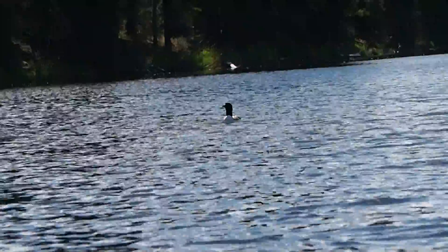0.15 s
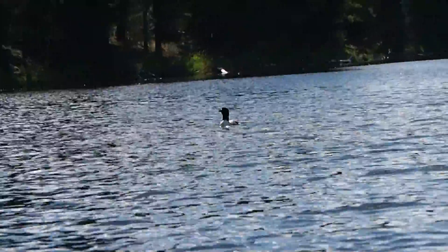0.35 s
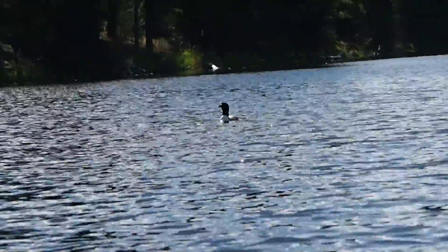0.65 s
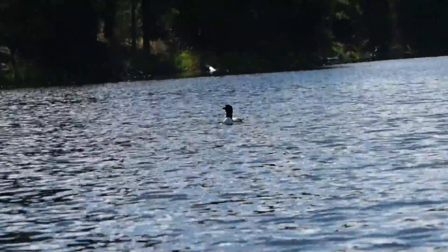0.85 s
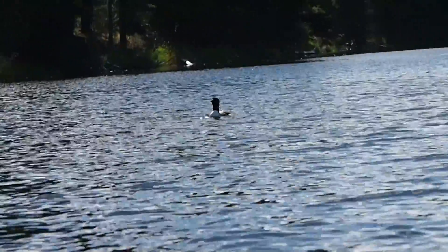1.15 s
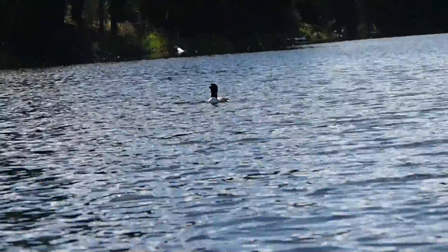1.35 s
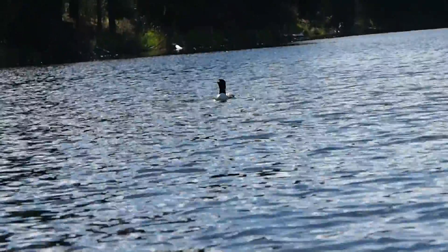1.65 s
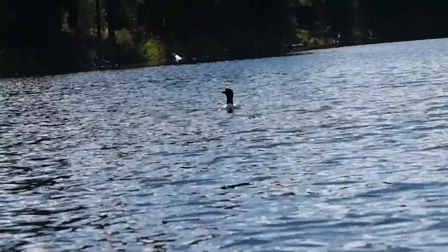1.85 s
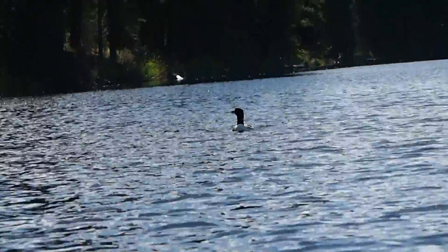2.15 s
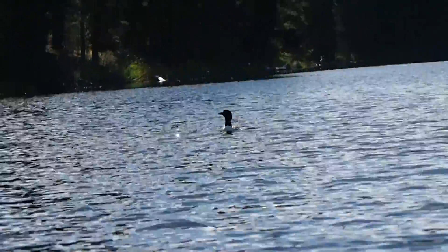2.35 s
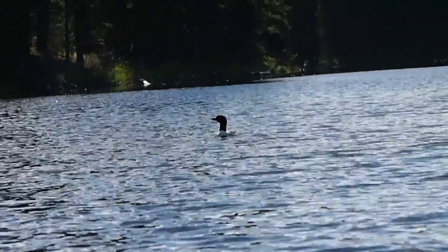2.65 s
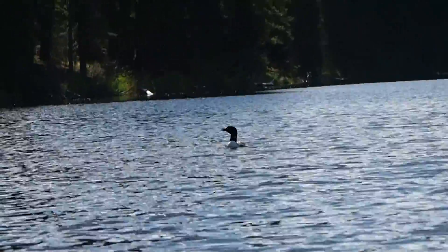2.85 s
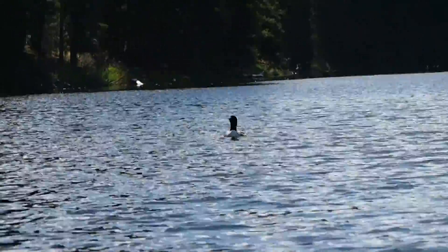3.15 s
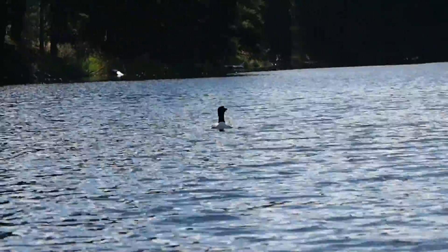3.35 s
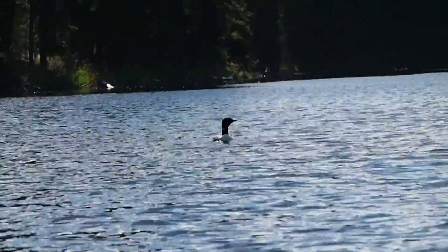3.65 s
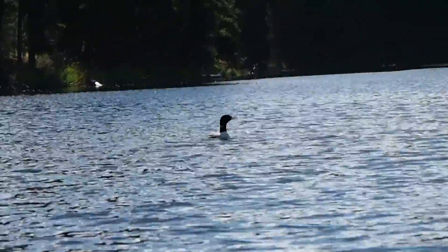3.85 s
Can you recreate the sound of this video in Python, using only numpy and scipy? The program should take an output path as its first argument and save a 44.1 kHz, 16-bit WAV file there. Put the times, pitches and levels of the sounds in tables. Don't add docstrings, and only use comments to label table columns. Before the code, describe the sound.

A loon gives two short bursts of wavering, laughing whistle calls across an echoing forest lake.

```python
import sys
import numpy as np
from scipy import signal
from scipy.fft import rfft, irfft
from scipy.io import wavfile
from scipy.ndimage import uniform_filter1d

SR = 44100
rng = np.random.default_rng(int(sys.argv[2]) if len(sys.argv) > 2 else 0)


def volts_from_decibels(level):
    exponent = np.asarray(level, float) / 20
    return 10 ** exponent


def persist_wave(psi):
    counts = np.round(np.clip(psi, -1, 1) * 32767).astype(np.int16)
    wavfile.write(sys.argv[1], SR, np.atleast_2d(counts).T)


N = 176400


def evened(x):
    return x / np.sqrt(np.mean(x ** 2) + 1e-20)


def read(points, hz):
    f, value = np.transpose(points)
    return np.interp(np.log(hz + 1), np.log(f + 1), value)


def add(mix, s, sound):
    part = mix[round(s * SR):][:len(sound)]
    part += sound[:len(part)]


def colour(x, table):
    size = np.shape(x)[-1]
    return irfft(rfft(x) * volts_from_decibels(read(table, np.fft.rfftfreq(size, 1 / SR))), size)


def band(x, lo_hz, hi_hz):
    return signal.sosfilt(signal.butter(2, [lo_hz, hi_hz], "bandpass", fs=SR, output="sos"), x)


def smooth(x, s):
    return uniform_filter1d(x, max(round(s * SR), 1), mode="nearest")


def air():
    # frequency in Hz, level in dB per Hz.
    hiss_colour = [(15, -59), (25, -24.5), (86, -18), (140, -16), (215, -16.5), (289, -18.5), (358, -16.5),
                   (8120, -33), (15500, -40.5)]
    # frequency in Hz, correlation (0 to 1).
    likeness = [(30, 0.67), (250, 0.59), (1000, 0.3), (4000, 0.2), (8000, 0.12), (14000, .05)]
    hiss_db, patch_db = -55, 0.37
    insects_hz, insects_width_hz, insects_db = 7970, 600, -70.5
    frames, hz = N // 256 + 5, np.fft.rfftfreq(1024, 1 / SR)
    a, b, c, d, patches = rng.standard_normal((frames, 513, 5)).T
    patches = uniform_filter1d(uniform_filter1d(patches, 12, 0), 14, 1)
    level_db = read(hiss_colour, hz)[:, None] + patch_db * evened(patches)
    same = np.clip(read(likeness, hz), -1, 1)[:, None]
    left = a + 1j * b
    right = same * left + np.sqrt(1 - same ** 2) * (c + 1j * d)
    z = np.array([left, right]) * volts_from_decibels(level_db)
    hiss = signal.istft(z, nperseg=1024, noverlap=768)[1][:, :N]
    hiss = hiss / np.std(band(hiss, 400, 15000))
    half_hz = insects_width_hz / 2
    insects = band(rng.standard_normal((2, N)), insects_hz - half_hz, insects_hz + half_hz)
    return volts_from_decibels(hiss_db) * hiss + volts_from_decibels(insects_db) * evened(insects)


def motor():
    # time in s, first order level in dB, second order level in dB.
    swells = [(.01, -49, -51.5), (.21, -60.5, -50), (.47, -56, -56.5), (.62, -52, -49.5),
              (1.1, -49.5, -53.5), (1.27, -63, -56.5), (1.47, -49.5, -62.5), (2.5, -50, -55.5),
              (2.68, -56.5, -62.5), (2.8, -49, -53), (3.17, -56, -53.5), (3.34, -46.5, -51),
              (3.72, -68, -58.5), (3.93, -53.5, -71)]
    motor_hz, sag_hz_per_s = 141.8, 0.71
    s, first_db, second_db = np.transpose(swells)
    t = np.arange(N) / SR
    turns = 2 * np.pi * np.cumsum(motor_hz - sag_hz_per_s * t) / SR
    out = np.zeros(N)
    for order, db in enumerate((first_db, second_db), 1):
        out += smooth(volts_from_decibels(np.interp(t, s, db)), 0.05) * np.sin(order * turns)
    return np.sqrt(2) * out


def shore(x):
    # frequency in Hz, T60 in s.
    decay_s = [(600, 3.8), (1200, 2.01), (2500, 0.4), (6000, .6)]
    # frequency in Hz, level in dB.
    echo_colour = [(600, -12.5), (1200, 1), (2400, -6), (5000, -13.5)]
    echo_db, delay_s, rise_s = -17.5, 0.058, 0.32
    far_db, far_t60_s = -34.5, 17.8
    earlier_s, earlier_db = 4.785, 1
    taps_per_s = 400
    noise = rng.standard_normal((2, 3 * SR))
    hits = rng.random(3 * SR) < taps_per_s / SR
    near, apart = noise * hits * np.sqrt(SR / taps_per_s)
    hz, t, z = signal.stft(np.array([near + .3 * apart, near - .3 * apart]), SR, nperseg=256)
    swell = np.clip((t - delay_s) / rise_s, 0, 1)
    shape = swell * (volts_from_decibels(-60 * t / read(decay_s, hz)[:, None]) + volts_from_decibels(far_db - 60 * t / far_t60_s))
    tail = signal.istft(z * shape * volts_from_decibels(read(echo_colour, hz))[:, None], SR, nperseg=256)[1]
    tail = tail / np.sqrt(np.sum(shape[6] ** 2) * 128)
    second = x * (np.arange(N) > 3 * SR)
    earlier = signal.fftconvolve(second[None], tail[::-1], axes=1)[:, round(earlier_s * SR):]
    earlier = np.pad(earlier, ((0, 0), (0, N)))[:, :N]
    echo = signal.fftconvolve(x[None], tail, axes=1)[:, :N]
    return volts_from_decibels(echo_db) * (echo + volts_from_decibels(earlier_db) * earlier)


def hull():
    # start in s, level in dB, length in s, low edge in Hz, high edge in Hz.
    laps = [
        (1.001, -50, 0.058, 513, 2130),
        (1.259, -49.5, 0.043, 670, 2470),
    ]
    # start in s, level in dB, pitch in Hz, length in s.
    gulps = [
        (1.028, -44, 513.6, .05),
        (1.036, -41, 345, .065),
        (1.146, -51, 354, .05),
    ]
    out = np.zeros(N)
    for s, db, length_s, lo_hz, hi_hz in laps:
        u = np.arange(0, 1, 1 / (length_s * SR))
        noise, flicker = rng.standard_normal((2, len(u)))
        fizz = band(noise * volts_from_decibels(3 * evened(smooth(flicker, .002))), lo_hz, hi_hz)
        add(out, s, volts_from_decibels(db) * evened(fizz) * np.sin(np.pi * u ** 0.54))
    for s, db, hz, length_s in gulps:
        u = np.arange(0, 1, 1 / (length_s * SR))
        wobble = 1 + .5 * evened(smooth(rng.standard_normal(SR // 8), 0.0027))[:len(u)]
        tone = np.sin(2 * np.pi * hz * length_s * (u + 0.051 * u ** 2))
        add(out, s, volts_from_decibels(db) * wobble * np.sin(np.pi * u) * tone)
    return out


def waver(t, turns):
    s, hz = np.transpose(turns)
    place = np.interp(t, s, np.arange(len(s)))
    k = np.minimum(place.astype(int), len(s) - 2)
    return hz[k] + (hz[k + 1] - hz[k]) * (1 - np.cos(np.pi * (place - k))) / 2


def whistle(curve, open_db, waves, tones_db, crest_hz, sag_share, buzz):
    # frequency in Hz, gain in dB.
    pipe = [(1200, -9.5), (2200, 7), (2900, 2), (3500, 20.5), (5200, 9.5), (6800, -17), (9500, 1),
            (13000, 4)]
    dull_db = 40
    edge_s, glide_s = 0.004, 0.0018
    buzz_hz, buzz_swing = 236.5, 1.32
    breath_db, shimmer_db = -47.5, 0.12
    s, db = np.transpose(curve)
    t = np.arange(s[0] - edge_s / 2, s[-1] + edge_s / 2, 1 / SR)
    breath, shimmer = rng.standard_normal((2, len(t)))
    hz = waver(t, waves)
    db = smooth(np.interp(t, s, db), glide_s)
    turns = 2 * np.pi * np.cumsum(hz) / SR
    buzz_turns = 2 * np.pi * np.cumsum(buzz_hz * hz / crest_hz) / SR
    shake = buzz * volts_from_decibels(0.25 * (db - db.max())) * np.sin(buzz_turns)
    sag = np.minimum(hz / crest_hz - 1, .06) * sag_share
    voice = np.zeros(len(t))
    for k, tone_db in enumerate(tones_db, 1):
        slide_db = (read(pipe, k * hz) - read(pipe, k * crest_hz)) * (k > 1)
        bill_db = open_db * min((k - 1) / 4, 1) ** 2
        tone = (1 + .45 * k * shake) * np.sin(k * turns + k ** buzz_swing * shake)
        voice += volts_from_decibels(tone_db + slide_db + bill_db + dull_db * sag * np.log2(k)) * tone
    breath = volts_from_decibels(breath_db) * evened(band(breath, 740, 7400)) * (1 + np.sin(turns))
    voice = np.sqrt(2) * voice + breath
    to_edge_s = np.minimum(t - t[0], t[-1] - t)
    edge = np.sin(np.pi / 2 * np.clip(to_edge_s / edge_s, 0, 1)) ** 2
    return t[0], voice * edge * volts_from_decibels(db + shimmer_db * evened(smooth(shimmer, 0.0041)))


def loon():
    # time in s, level in dB.
    low_curves = [
        [(1.834, -45), (1.848, -24.5), (1.89, -27.5), (1.907, -39.5), (1.92, -25.5), (1.941, -17.5),
         (1.949, -25.5)],
        [(2.432, -31.5), (2.468, -23), (2.5, -29), (2.552, -41)],
        [(3.254, -42), (3.272, -23.5), (3.295, -19.5), (3.32, -27), (3.333, -33.5), (3.345, -25.5),
         (3.361, -18), (3.366, -24.5)],
        [(3.848, -33), (3.862, -30), (3.89, -26.5), (3.93, -35), (3.942, -38.5)],
    ]
    low_flip_curves = [
        [(2.318, -36.5), (2.33, -24), (2.343, -25.5)],
    ]
    middle_long_curves = [
        [(1.95, -20), (1.958, -11), (1.985, -14), (2.008, -23), (2.03, -12.5), (2.068, -15), (2.079, -30.5),
         (2.098, -27)],
        [(3.368, -13), (3.412, -13), (3.433, -20.5), (3.455, -14.5), (3.475, -11.5), (3.503, -15),
         (3.51, -20.5), (3.546, -14), (3.555, -12.5)],
    ]
    middle_curves = [
        [(2.112, -20), (2.124, -14), (2.14, -12.5), (2.154, -22)],
        [(2.214, -22), (2.228, -15.5), (2.245, -12), (2.27, -24.5)],
        [(2.308, -46.5), (2.32, -26), (2.338, -40), (2.348, -12.5), (2.39, -15), (2.41, -20), (2.435, -32)],
        [(3.735, -27), (3.752, -15.5), (3.802, -15.5), (3.83, -20), (3.852, -33.5)],
    ]
    high_curves = [
        [(2.078, -27), (2.084, -18), (2.108, -29.5)],
        [(2.155, -25.5), (2.162, -10.5), (2.175, -13.5), (2.19, -24.5), (2.21, -30.5)],
        [(2.27, -28.5), (2.277, -16), (2.288, -21), (2.308, -33)],
    ]
    high_buzz_curves = [
        [(3.557, -21), (3.565, -11), (3.595, -12.5), (3.61, -18), (3.62, -35.5), (3.63, -26)],
    ]
    high_pure_curves = [
        [(3.63, -33.5), (3.648, -24), (3.668, -10.5), (3.692, -14), (3.71, -22), (3.735, -39.5)],
    ]
    # time in s, pitch in Hz.
    low_turns = [(1.825, 644), (1.855, 706.6), (1.903, 634.7), (1.965, 851), (2.305, 632), (2.36, 785),
                 (2.425, 622.7), (2.472, 710), (2.535, 591), (3.245, 608), (3.292, 728.8), (3.333, 644.4),
                 (3.385, 892), (3.84, 640), (3.888, 698.5), (3.945, 621)]
    middle_turns = [(1.945, 1125), (2.006, 905), (2.06, 1174), (2.105, 930), (2.165, 1280), (2.208, 930),
                    (2.265, 1215), (2.318, 915), (2.358, 1104), (2.422, 880), (3.378, 1165), (3.43, 908),
                    (3.482, 1206), (3.53, 922), (3.575, 1230), (3.73, 930), (3.776, 1150), (3.84, 897)]
    high_turns = [(2.07, 1265), (2.115, 1067), (2.155, 1410), (2.215, 1124), (2.268, 1317), (2.315, 1102),
                  (3.54, 1352), (3.58, 1430), (3.63, 1174), (3.68, 1397), (3.735, 1151)]
    # level in dB, from the fundamental up.
    low_tones = [0.5, -6, -19, -37, -15, -23.5, -23, -40.5, -42, -59, -51.5]
    middle_tones = [1, -20, -23, -26, -33.5, -36, -41, -37.5, -48.5, -55]
    high_tones = [-1, -32.5, -30, -35.5, -44.5, -37, -38, -64]
    # gain on the upper overtones in dB, one per stretch in groups order.
    bill_open = [-14.5, -3.5, -12, -0.8, -4, -1.5, -3.4, -3, -0.7, 1, -1.5, 3, 2.5, 3, -3, 1.5]
    # waver, overtones, crest in Hz, share of the sag that dulls, buzz depth
    low = (low_turns, low_tones, 683, 1, 0)
    middle = (middle_turns, middle_tones, 1207, 1, 0)
    high = (high_turns, high_tones, 1456, 1 / 3)
    groups = [(low_curves, low), (low_flip_curves, low),
              (middle_long_curves, middle), (middle_curves, middle),
              (high_curves, high + (0.25,)), (high_buzz_curves, high + (0.31,)),
              (high_pure_curves, high + (0,))]
    stretches = [(curve, register) for curves, register in groups for curve in curves]
    out = np.zeros(N)
    for (curve, register), open_db in zip(stretches, bill_open):
        add(out, *whistle(curve, open_db, *register))
    return out


def scene():
    # frequency in Hz, left minus right in dB.
    loon_pan = [(1200, -.2), (2400, -1.6), (5000, -2.5), (8500, 7)]
    bird = loon()
    direct = np.array([colour(bird, [(hz, side * db / 2) for hz, db in loon_pan]) for side in (1, -1)])
    direct[1] = np.roll(direct[1], 1)
    motor_sides = volts_from_decibels(np.array([[-.4], [.4]]))
    return direct + shore(bird) + motor() * motor_sides + hull() + air()


def top_cut(x):
    return signal.sosfilt(signal.butter(12, 15630, fs=SR, output="sos"), x)


def record(dry):
    return top_cut(dry)


dry = scene()
out = record(dry)
persist_wave(out)
```